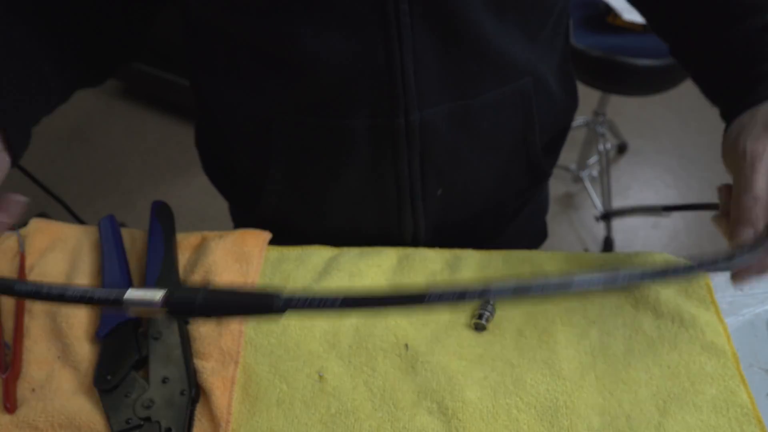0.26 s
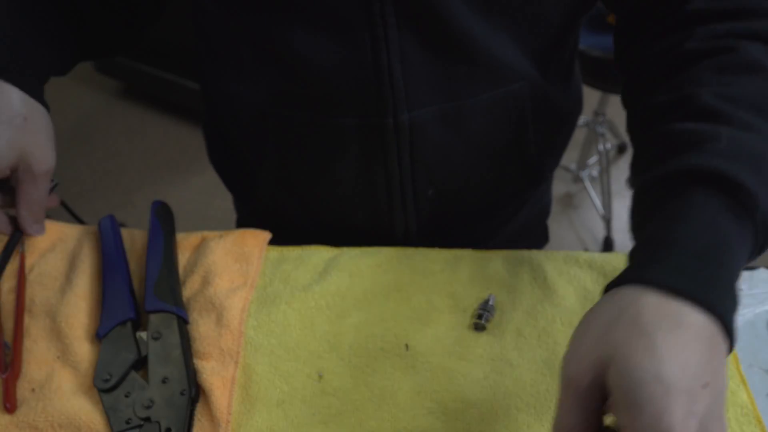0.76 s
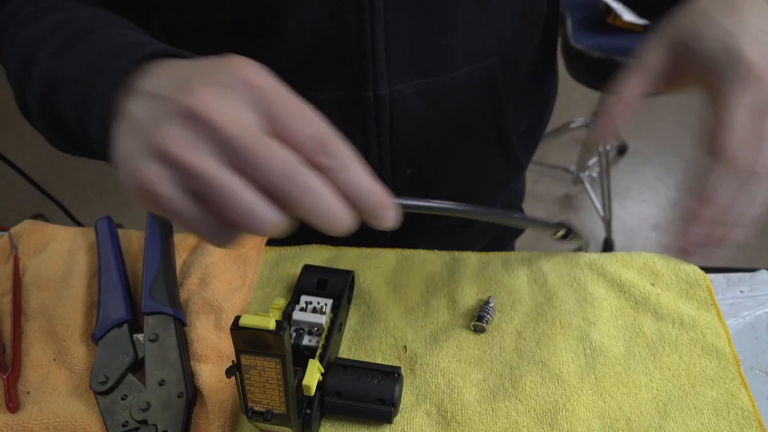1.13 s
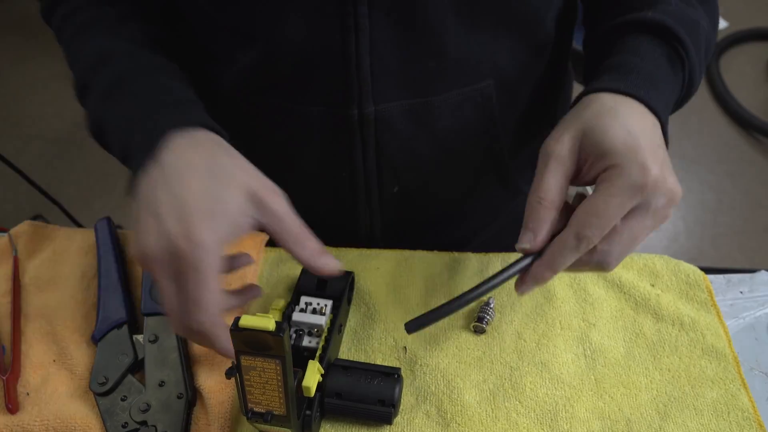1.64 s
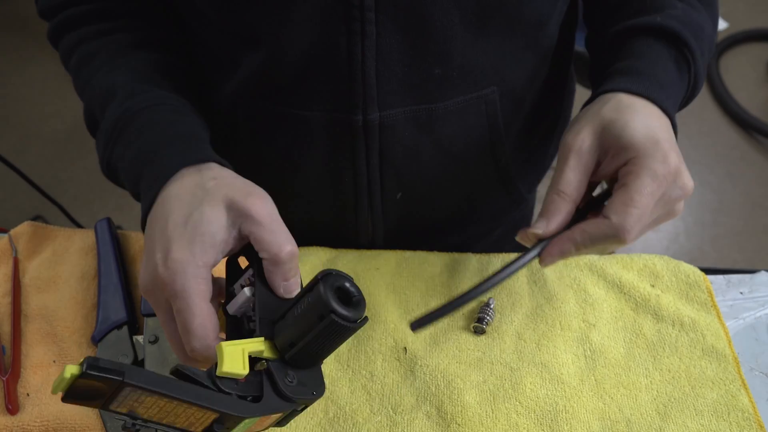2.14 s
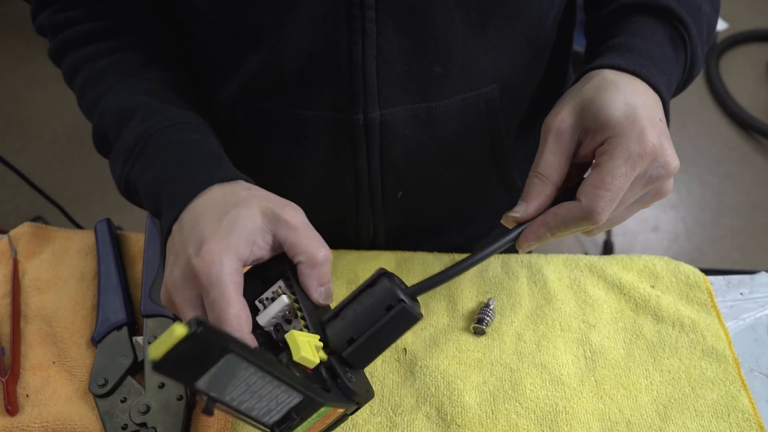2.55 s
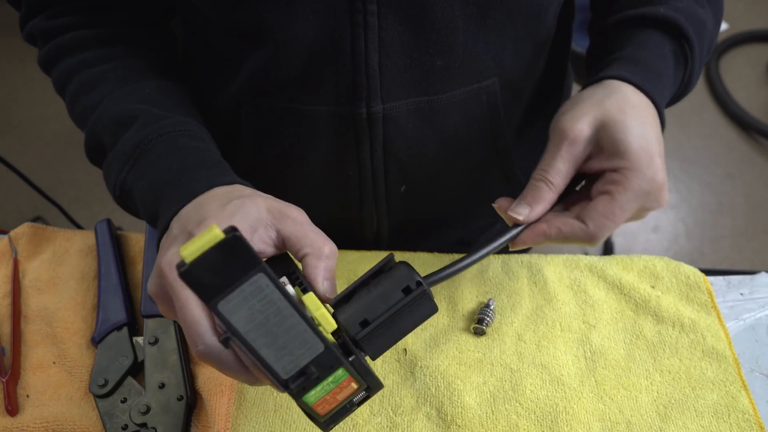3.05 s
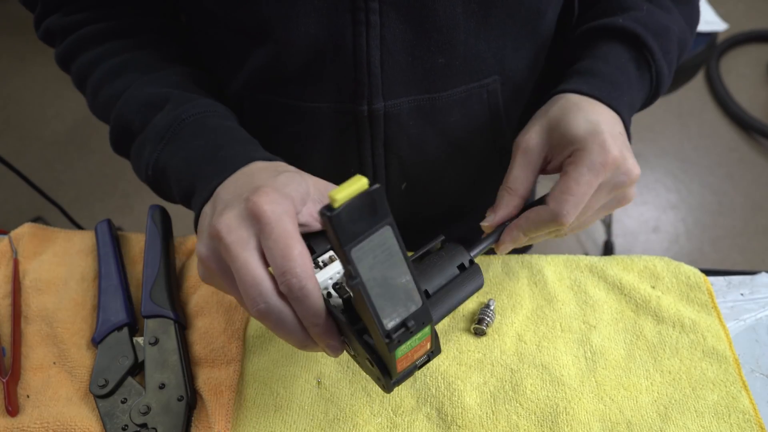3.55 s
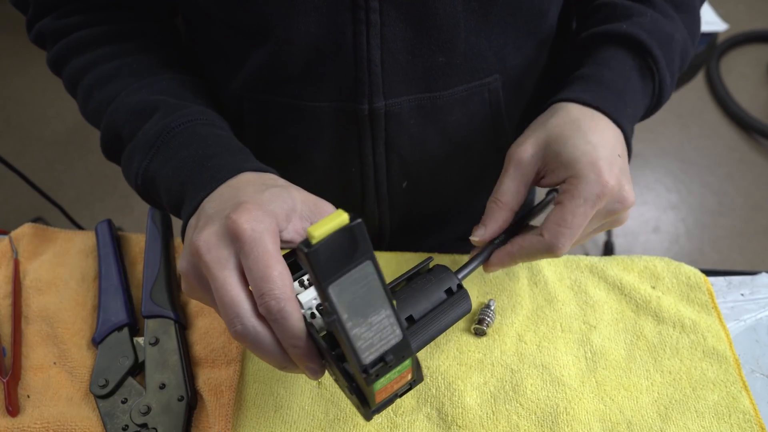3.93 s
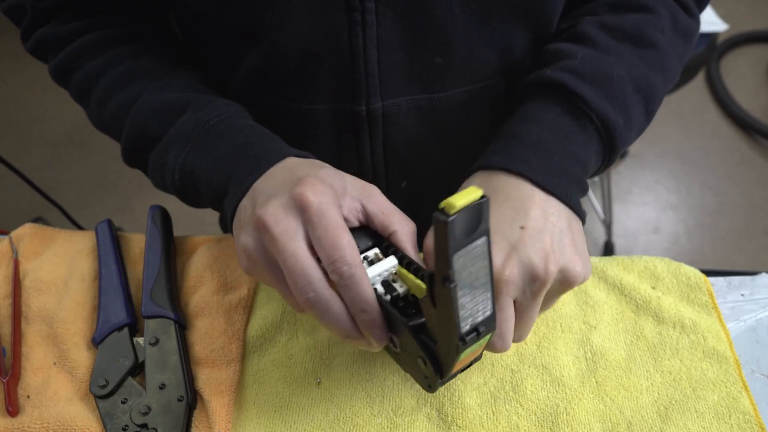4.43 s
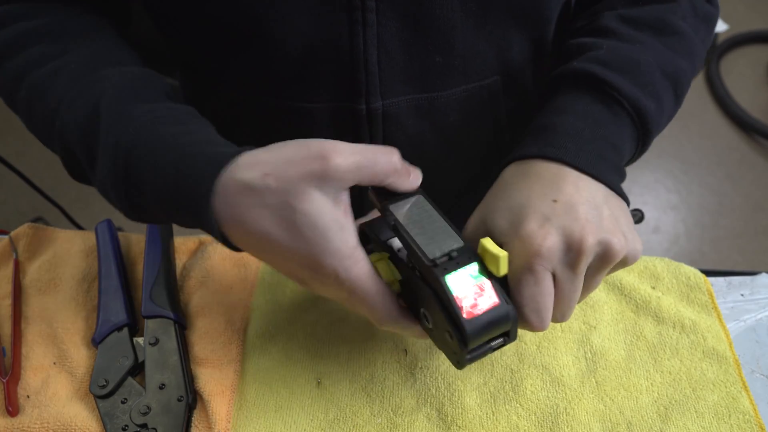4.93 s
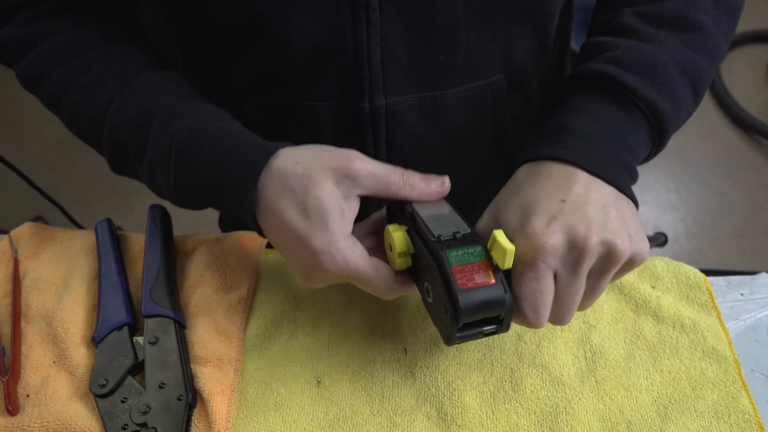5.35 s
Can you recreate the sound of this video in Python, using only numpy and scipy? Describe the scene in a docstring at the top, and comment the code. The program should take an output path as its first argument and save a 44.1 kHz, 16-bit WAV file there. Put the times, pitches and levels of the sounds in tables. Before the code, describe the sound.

A quiet workshop with faint low motor hum and steady air. Sleeves rustle barely, a hand softly bumps a padded bench, then a plastic cable stripper is picked up with light ticks, clacks and tiny scrapes. After a near-quiet pause, firmer clicks lead to one loud latch crack with a short room echo and a last faint tick. Close microphone.

```python
"""A quiet workshop with a low motor hum and a steady rush of air: shaped noise and wavering tones.
A very faint, high, airy hiss fades at the start, sleeves rustle and a hand bumps the padded bench.
A plastic coax stripper is picked up: its loose lid and blade holder knock, tick and scrape, noise and
pulses ringing in a plastic shell. The cable squeaks as it slides in, a tone that rises with the push.
More knocks follow, then the latch shuts with one loud crack, and the room briefly echoes the tool."""
import sys
import numpy as np
from scipy import signal
from scipy.fft import rfft, irfft, next_fast_len
from scipy.io import wavfile
from scipy.ndimage import uniform_filter1d

SR = 44100
rng = np.random.default_rng(int(sys.argv[2]) if len(sys.argv) > 2 else 0)


def store_wav(level_fs):
    """Save 16-bit WAV to argv[1]."""
    pcm = np.round(np.clip(np.atleast_2d(level_fs), -1, 1) * 32767)
    wavfile.write(sys.argv[1], SR, pcm.T.astype(np.int16))


N = 246959
T = np.arange(N) / SR  # time in s

# fixed resonances of the plastic shell: f/Hz, width/Hz, relative level/dB
SHELL_MODES = [(997, 810, -12.5), (1690, 440, -11), (2130, 250, -8.5), (2600, 220, -9.5), (3200, 360, -9.5),
               (3760, 340, -7.5), (4460, 430, -13.5)]
# tone of the bright edge of a contact: f/Hz, relative level/dB
EDGE_TONE = [(2500, -19.5), (4300, -1.5), (5800, 2), (7000, 1), (8100, 0), (10500, -4), (13000, -11.5),
             (16000, -18)]
# plastic dragging on plastic and on the cable jacket: start t/s, length/s, relative level/dB
DRAGS = [(2.038, .06, -69), (2.172, 0.057, -71), (2.566, 0.073, -67.5), (2.98, 0.036, -67),
         (3.175, .085, -66), (3.268, .03, -54), (3.300, .014, -56), (3.471, 0.02, -68), (4.37, 0.068, -70),
         (4.589, .03, -62.5), (4.843, 0.031, -62.5), (4.934, .038, -54.5), (5.069, .1, -70),
         (5.177, 0.035, -56.5), (5.49, .03, -71)]
LEAD_S = .005  # a knock's chatter starts this long before its main contact


def undb(db):
    """Decibels to gain."""
    return 10 ** (np.asarray(db) / 20)


def unit(x):
    """Scale to rms 1."""
    return x / np.sqrt(np.mean(x ** 2))


def add(out, s, x):
    """Mix x into out from time s."""
    i = int(s * SR)
    out[i:i + len(x)] += x[:len(out) - i]


def colour(x, points):
    """Filter through (f/Hz, level/dB) points, with no sound ahead of its cause (minimum phase)."""
    size = 2 * next_fast_len(len(x) // 2 + SR // 10, True)
    hz, db = np.transpose(points)
    log_f = np.log(np.fft.rfftfreq(size, 1 / SR) + 1)
    log_gain = np.log(undb(np.interp(log_f, np.log(hz), db)))
    # folding the cepstrum onto positive times makes the filter causal
    cepstrum = irfft(log_gain)
    cepstrum[1:size // 2] *= 2
    cepstrum[size // 2 + 1:] = 0
    response = np.exp(rfft(cepstrum))
    return irfft(rfft(x, size) * response)[:len(x)]


def ring(force, modes):
    """Damped resonances (f/Hz, width/Hz, level/dB) driven by a force; narrow ones ring longer."""
    out = 0
    for hz, width, db in modes:
        b, a = signal.iirpeak(hz, hz / width, fs=SR)
        out = out + undb(db) * signal.lfilter(b, a, force)
    return out


def grains(size, spread_db):
    """Dense tiny contacts as noise; a larger spread makes their strengths more unequal."""
    boost = np.minimum(rng.exponential(size=size), 5)
    return unit(rng.standard_normal(size) * undb(spread_db * boost))


def gesture(start_s, length_s, rise_share):
    """One smooth swell, 0 to 1, such as the speed of a hand movement: a rounded rise and fall."""
    turn = np.clip(rise_share, .05, .95)
    progress = np.interp((T - start_s) / length_s, [0, turn, 1], [0, .5, 1])
    return np.sin(np.pi * progress)


def background(waver_hz=0.36, air_db=-63.5):
    """Hum of a distant motor, sine tones of slightly wavering pitch, over a steady rush of air."""
    # tone of the air: f/Hz, relative level per Hz/dB
    air_tone = [(20, -7), (31, 21.5), (45, -3.5), (80, 2), (120, 3), (200, -2), (330, -3), (550, -2),
                (900, -8), (1600, -11.5), (3000, -20.5), (5000, -25.5), (12000, -29), (16000, -50.5)]
    # motor tones: f/Hz, rms level/dB
    motor_tones = [(58.3, -54.5), (119.5, -77), (241, -82.5), (291, -81), (463, -78.5), (582.5, -69.5)]
    out = undb(air_db) * unit(colour(rng.standard_normal(N), air_tone))
    for hz, db in motor_tones:
        drift = np.interp(T, np.linspace(0, T[-1], 20), rng.standard_normal(20))
        pitch = hz + waver_hz * np.sqrt(hz / 500) * drift
        phase = np.cumsum(pitch) / SR + rng.random()
        out += undb(db) * np.sqrt(2) * np.sin(2 * np.pi * phase)
    return out


def room_tail(x, delay_s=0.0049):
    """A diffuse echo: noise in frequency bands, each dying away at its own pace."""
    # echo bands: f/Hz, level/dB, time to fall by 60 dB/s
    echo_bands = [(150, -32, .25), (600, -12, 0.27), (1200, -17, 0.27), (2000, -13.5, 0.29),
                  (3570, -17, 0.26), (5370, -16.5, 0.31), (8440, -14, 0.26), (15030, -15, 0.18)]
    t = T[:SR // 2]
    hz, db, t60 = np.transpose(echo_bands)
    noise = rfft(rng.standard_normal(len(t)))
    log_f = np.log(np.fft.rfftfreq(len(t), 1 / SR) + 1)
    tail = np.zeros(N)
    # each row of the identity picks one band, blending into its neighbours
    for share, band_db, decay in zip(np.eye(len(hz)), db, t60):
        fade = np.exp(-np.log(1000) * t / decay)
        band = irfft(noise * np.interp(log_f, np.log(hz), share), len(t))
        add(tail, delay_s, undb(band_db) * band * fade / np.linalg.norm(fade))
    return signal.fftconvolve(x, tail[:SR])[:N]


def room(radiated):
    """The workshop's answer: early reflections off the bench and the things on it, and a tail."""
    # single reflections: delay t/s, level/dB
    early = [(.0043, -23), (.0082, -24.5), (.0112, -25.5), (0.0157, -25)]
    echo = room_tail(radiated)
    for delay_s, db in early:
        add(echo, delay_s, undb(db) * radiated)
    return echo


def opening_hiss():
    """Very faint airy noise in one broad, high band, near the start."""
    hiss = unit(ring(rng.standard_normal(N), [(14800, 3000, 0)]))
    # the hiss is already sounding at time 0
    return undb(-77.5) * hiss * gesture(-.05, .27, rise_share=.45)


def cloth_rustle():
    """Cloth noise that is louder the faster the sleeves and cable stroke over it."""
    # tone of the cloth: f/Hz, relative level/dB
    cloth_tone = [(800, -7), (2000, 10), (4000, -1), (8500, 4.5), (12000, -4), (16000, -7.5)]
    # strokes: start t/s, length/s, rms level at top speed/dB
    stroke_list = [(.02, 1.55, -79.5), (1.14, .11, -73), (1.298, 0.57, -76), (1.89, .2, -76),
                   (2.113, 0.19, -76), (4.311, 0.12, -72), (4.44, 0.28, -74.5), (4.748, 0.55, -73),
                   (5.53, .15, -76)]
    speed = np.zeros(N)
    for s, length, db in stroke_list:
        # a stroke gathers speed faster than it slows
        speed += undb(db) * gesture(s, length, rise_share=.25)
    return unit(colour(grains(N, spread_db=3.5), cloth_tone)) * speed


def bench_bump(bump_s=1.163, peak_db=-49):
    """A hand lands on the padded bench: a soft, noisy push rings its low thump and scuff."""
    # thump and scuff: f/Hz, width/Hz, relative level/dB
    bench_modes = [(108, 41, 3), (189, 56, -12), (1900, 900, -28), (3200, 800, -38)]
    out, t = np.zeros(N), T[:SR // 5]
    push = colour(rng.standard_normal(len(t)) * np.exp(-t / .026), [(3000, 0), (8000, -16)])
    thud = ring(push, bench_modes)
    add(out, bump_s, undb(peak_db) * thud / np.abs(thud).max())
    return out


def squeak(slow_hz=8700, rise_hz=980, waver_hz=70, peak_db=-84.5):
    """The jacket squeaks in the guide: one push sets both level and pitch of a thin tone."""
    speed = gesture(3.82, .32, rise_share=.42)
    waver = unit(uniform_filter1d(rng.standard_normal(N), size=120))
    pitch = slow_hz + rise_hz * np.sqrt(np.abs(speed)) + waver_hz * waver
    return undb(peak_db) * speed * np.sin(2 * np.pi * np.cumsum(pitch) / SR)


def scrapes():
    """Short drags: noise with an uneven, stick-slip grip, ringing the shell and sounding at the edge."""
    force, t = np.zeros(N), T[:SR // 5]
    for s, length, db in DRAGS:
        pressure = np.interp(t / max(length, .003), [0, .2, .7, 1], [0, 1, 1, 0])
        grip_db = 4.2 * unit(uniform_filter1d(rng.standard_normal(len(t)), size=130))
        rubbing = unit(undb(grip_db) * grains(len(t), spread_db=0.0))
        add(force, s, undb(db) * pressure * rubbing)
    shell = colour(ring(force, SHELL_MODES), [(4300, -1), (9000, -9.5)])
    return undb(13.0) * shell + undb(-6.5) * colour(force, EDGE_TONE)


def knock(db, hz, treble_db, chatter_ms, width_hz=290, chatter_db=-16, rise_share=.45, soft_db=-4, focus=.55):
    """One contact inside a brief chatter rings the shell, whose main resonance shifts with the grip."""
    # the steel blades ring on faintly: f/Hz, width/Hz, relative level/dB
    blade_modes = [(7500, 40, -2.5), (7980, 28, -0.5), (8450, 28, -3)]
    ms = (T[:SR // 10] - LEAD_S) * 10 ** 3
    # how far the level is below -32.5 dB, in steps of 20 dB; negative for firmer knocks
    gentle = (-32.5 - db) / 20
    # gentle contacts slip for longer; the chatter builds up faster than it dies
    fade_ms = max(chatter_ms * (1 + .5 * gentle), .1)
    swell = np.exp(-np.abs(ms) / np.where(ms < 0, rise_share, 1) / fade_ms)
    contact = signal.unit_impulse(len(ms), int(LEAD_S * SR))
    force = contact + undb(chatter_db) * swell * grains(len(ms), spread_db=5)
    # a dull knock puts more of its energy into the main resonance
    body = ring(force, [(hz, width_hz, -focus * treble_db - 4)] + SHELL_MODES)
    shell = colour(body, [(300, -8), (1100, -2), (1600, 1.5), (4300, -4.0), (7000, -17.0), (15000, -33)])
    edge = unit(colour(swell * grains(len(ms), spread_db=-1.0), EDGE_TONE))
    edge = edge + undb(4) * ring(unit(contact), blade_modes)
    # the treble weakens as the level moves away from -32.5 dB
    sound = unit(shell) + undb(treble_db + soft_db * gentle ** 2) * edge
    # the level is that of its energy gathered into 2 ms
    return undb(db) * sound / np.linalg.norm(sound) * np.sqrt(.002 * SR)


def catches(every_s=.022, above_drag_db=3.5, spread_db=1.5, middle_hz=1960, spread_octaves=.2):
    """A drag catches and lets go now and then: faint ticks, louder the harder it drags."""
    out = np.zeros(N)
    for start, length, db in DRAGS:
        count = int(np.clip(round(length / every_s), 1, 10))
        places, chance = rng.random(10), rng.standard_normal((10, 2))
        for k, (strength, grip) in enumerate(chance[:count]):
            hz = middle_hz * 2 ** (spread_octaves * grip)
            tick_db = db + above_drag_db + spread_db * strength
            tick = knock(tick_db, hz, treble_db=-15, chatter_ms=1.3)
            # one tick somewhere in each equal part of the drag
            add(out, start + length * (k + places[k]) / count - LEAD_S, tick)
    return out


def clicks():
    """Lid and blade holder knock as the tool is lifted, opened and fitted on the cable."""
    # clear knocks: t/s, level/dB, main shell resonance f/Hz, treble against the shell/dB,
    # chatter/ms (treble and chatter before the level adjusts them)
    knock_list = [(2.0497, -55, 1970, 4.5, 1.2), (2.064, -54.5, 1600, -11, 1.3),
                  (2.212, -55.5, 1670, 3.5, 0.62), (2.2504, -57.5, 1850, -15, 1.6),
                  (2.6196, -40, 3200, -6.5, 2.4), (2.6301, -41, 4330, 5, 0.94),
                  (2.856, -53, 1840, -23, 1.5), (2.8897, -43.5, 2680, -11.5, 1.5),
                  (2.969, -55.5, 2110, -11, 1.4), (3.006, -53, 2160, -26, .6),
                  (3.2137, -50, 2720, -4.5, 1.6), (3.2405, -53, 1905, -7, .8), (3.264, -32, 2270, -6, 0.7),
                  (3.287, -52.5, 1520, -4, 1.5), (3.491, -51.5, 2570, -23, 2.2),
                  (4.5637, -43, 2450, -14, 0.3), (4.9379, -39.5, 1875, -5.5, 1.2),
                  (4.9467, -45.5, 2030, 2, 2.1), (4.9833, -36, 1820, -1, 1.53),
                  (5.2086, -39, 1910, -13, .86), (5.212, -31.5, 1910, -10.5, 1.6),
                  (5.4541, -47.5, 1767, -28, .21)]
    out = np.zeros(N)
    for s, db, hz, treble_db, chatter_ms in knock_list:
        add(out, s - LEAD_S, knock(db, hz, treble_db, chatter_ms))
    return out


def snap(level_db=17, crackle_db=-39, crackle_s=0.0016):
    """Force of the latch riding over its catch, striking home and rebounding, with a brief buzz."""
    # blows: t/s, relative level/dB, contact/ms (2 pi times the decay time of the push)
    blow_list = [(5.244, -24, .08), (5.2453, -13, 0.033), (5.2464, 4, 0.1), (5.2489, -17, 0.034),
                 (5.2532, -24, .06)]
    force, t = np.zeros(N), T[:SR // 20]
    for s, db, contact_ms in blow_list:
        # a harder contact is a shorter push
        push = np.exp(-t * 10 ** 3 / max(contact_ms, .01) * 2 * np.pi)
        # the parts buzz against each other for a moment
        buzz = undb(crackle_db) * rng.standard_normal(len(t)) * np.exp(-t / crackle_s)
        add(force, s, undb(db) * (push / push.sum() + buzz))
    return undb(level_db) * force + 1e-18  # tiny offset, far too weak to hear


def closed_tool_crack(blow):
    """The latch's blows ring the closed tool: the loud crack heard close by."""
    # ring of the closed tool: f/Hz, width/Hz, relative level/dB
    closed_modes = [(700, 300, -6.5), (1060, 470, -14.5), (1810, 296, -0.5), (2054, 240, 0),
                    (2560, 110, -10.5), (3195, 130, 0), (3750, 220, -8), (4360, 510, -18.5),
                    (5730, 230, -9), (6550, 300, -11), (7730, 280, -8.5), (8200, 130, -9.5),
                    (9500, 140, -11.5), (10460, 450, -7.5), (11150, 250, -9.5), (13100, 450, -9),
                    (13900, 890, -15), (15300, 610, -17.5)]
    return colour(ring(blow, closed_modes), [(60, -19.0), (180, -17.5), (400, 0.5), (16000, 1.5)])


def crack_into_room(blow):
    """The crack's sound averaged over all directions, which sets off the echo."""
    # average tone of the tool: f/Hz, level/dB
    all_round_tone = [(100, -39), (550, -7), (1250, -6.5), (2000, -1.5), (2850, -9), (3500, -1),
                      (4300, -17), (8000, -9), (15000, -16)]
    return colour(blow, all_round_tone)


def scene():
    """The tool close by, its echo, and the quiet workshop."""
    surroundings = background() + opening_hiss() + cloth_rustle() + bench_bump() + squeak()
    small = scrapes() + catches() + clicks()
    blow = snap()
    echo = room(crack_into_room(blow) + small)
    return (surroundings + echo + small + closed_tool_crack(blow))[None]


def record(dry):
    """Clip at full scale, then cut everything above 16.3 kHz with a steep filter."""
    top_cut = signal.ellip(12, .2, 95, 16300, fs=SR, output="sos")
    return signal.sosfilt(top_cut, np.clip(dry, -1, 1))


dry = scene()
out = record(dry)
store_wav(out)
```